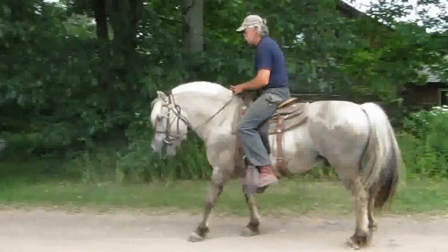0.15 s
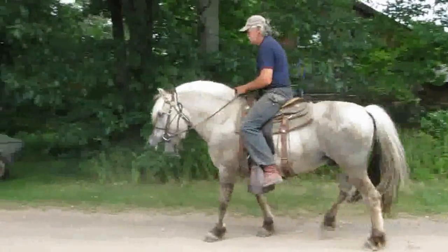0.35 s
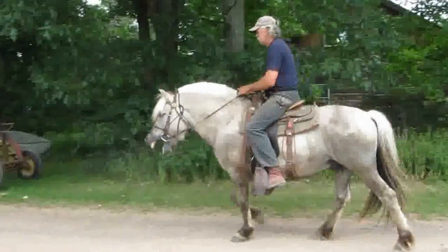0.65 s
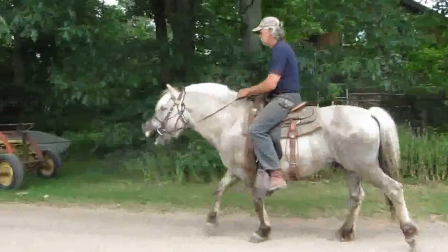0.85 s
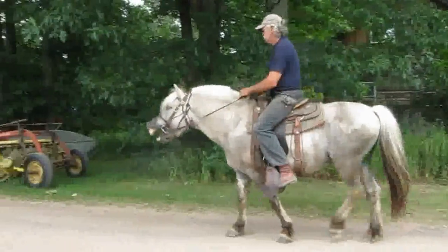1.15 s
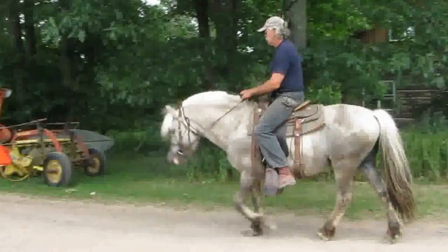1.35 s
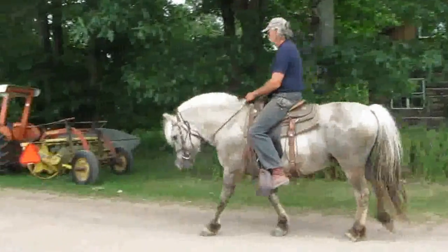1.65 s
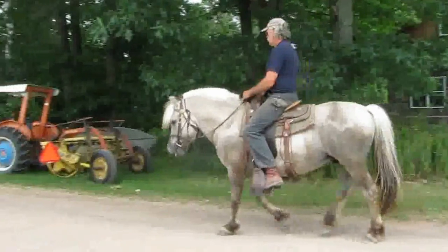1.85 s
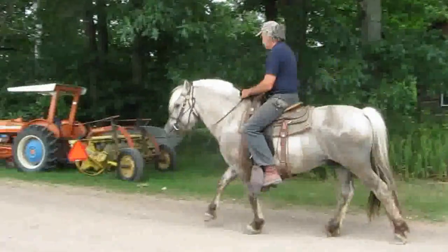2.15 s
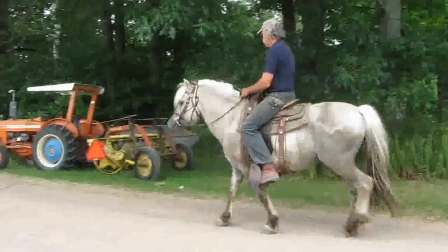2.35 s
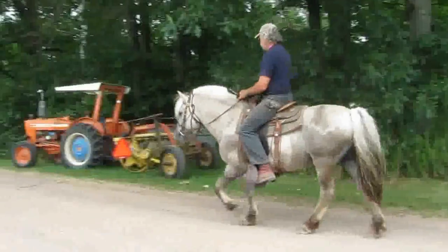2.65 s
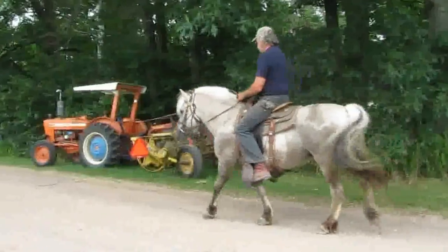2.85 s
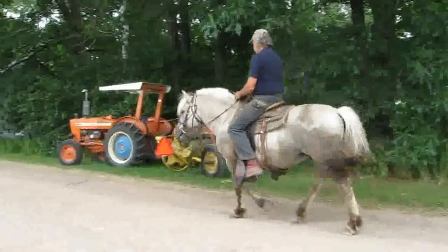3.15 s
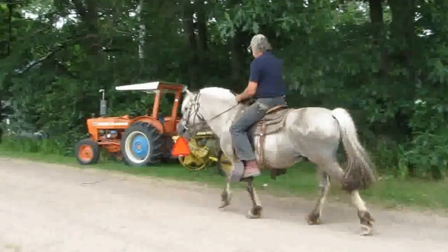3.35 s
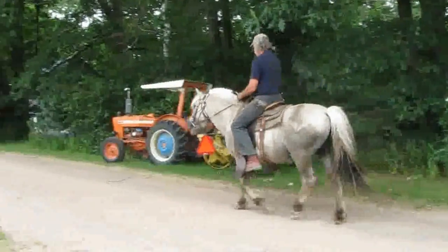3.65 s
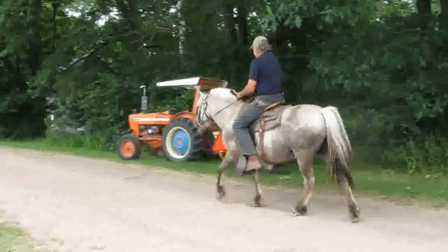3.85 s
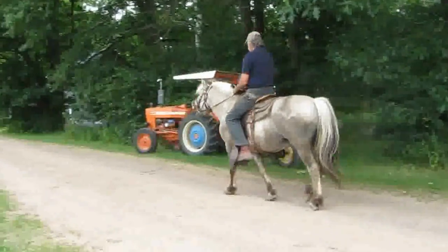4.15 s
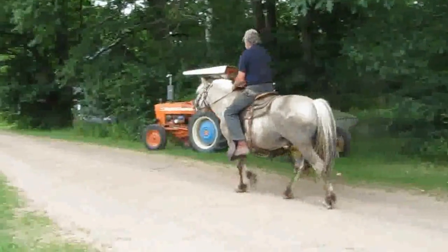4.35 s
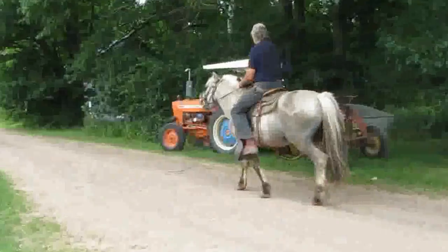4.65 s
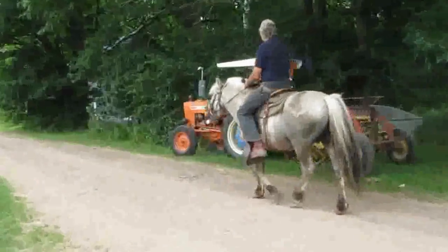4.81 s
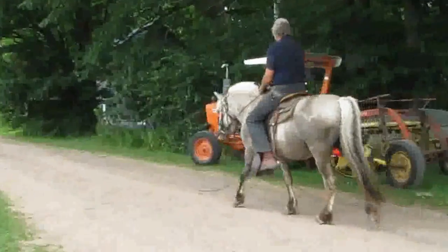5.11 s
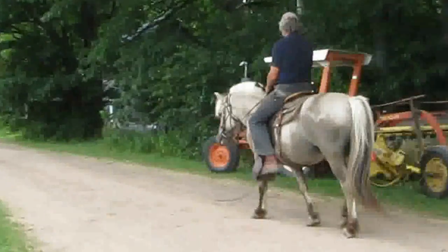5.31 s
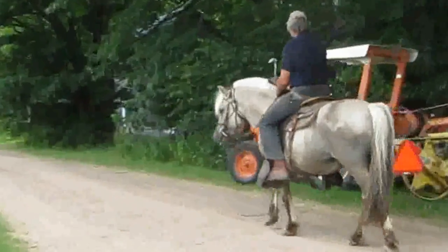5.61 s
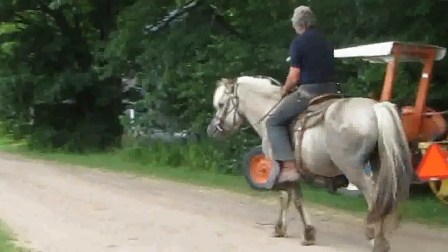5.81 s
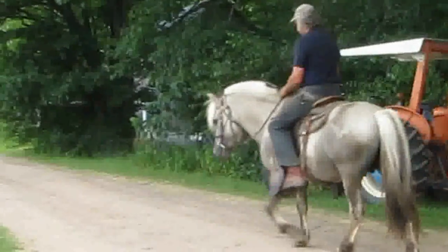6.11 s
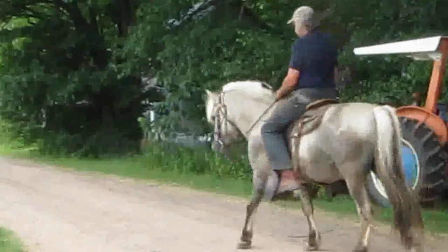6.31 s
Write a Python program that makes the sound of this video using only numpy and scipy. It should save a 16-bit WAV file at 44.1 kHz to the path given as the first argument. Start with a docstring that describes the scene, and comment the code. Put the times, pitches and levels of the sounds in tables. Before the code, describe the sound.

A horse walks on gravel, its hooves landing in crisp, slightly hollow crunches over faintly rustling leaves.

```python
"""A horse walks past on a gravel lane. Each hoof lands, rolls and lifts in several short crunches:
stones crack, the hollow hoof rings, the ground thuds and grit sprays. Loose gravel trickles between
the steps and swells where a hoof drags. Behind it: leaves, light wind on the microphone, a far rumble,
two low hums, a faint whine and a bird."""
import sys
import numpy as np
from scipy import signal
from scipy.io import wavfile
from scipy.ndimage import uniform_filter1d

SR = 44100
rng = np.random.default_rng(int(sys.argv[2]) if len(sys.argv) > 2 else 0)


def transcribe(signal):
    """Save signal, clipped to [-1, 1], as a 16-bit WAV file at the path in sys.argv[1]."""
    frames = np.atleast_2d(signal).T
    limited = np.clip(frames, -1, 1)
    pcm = np.round(limited * 32767).astype(np.int16)
    wavfile.write(sys.argv[1], SR, pcm)


N = 285371

# loose gravel under the moving legs: t/s, grit level/dB
TRICKLE_LEVEL = [(0.0, -50), (0.52, -60.5), (0.7, -46), (1.15, -52.5), (1.4, -41), (1.85, -54), (2.25, -43),
                 (2.61, -46.5), (2.72, -41), (3.03, -46.5), (3.33, -41), (3.66, -50.5), (4.11, -47),
                 (4.79, -50.5), (5.73, -45.5), (5.9, -53), (6.13, -56.5), (6.29, -43), (6.47, -48)]


def crunches():
    """Each crunch is a crack plus a burst of grains that drives hoof, stones, grit and ground."""
    # hoof contacts: t/s, crack/dB p-p, hoof/dB, stones/dB, stone f/Hz, grit/dB, ground/dB, length/ms
    contacts = [(0.1125, -28, -54, -46, 1880, -41, -71, 2.5), (0.2102, -16, -38, -31.5, 4100, -37, -61, 12),
                (0.2216, -25, -28.5, -32, 2700, -28, -37.5, 12.6),
                (0.5805, -29, -40, -35, 4570, -32, -62, 35),
                (0.5965, -9.5, -45, -30.5, 3380, -37, -61, 4.6), (0.628, -26, -55, -45, 3500, -42, -60, 3),
                (0.6734, -9, -29, -32.5, 2180, -25, -30, 7.3),
                (0.73, -24, -37.5, -39, 1640, -32.5, -39, 6.2), (0.7882, -9, -35, -39, 2340, -36, -50, 15),
                (0.8072, -12, -38, -42, 2790, -30, -56, 22), (0.8665, -16, -48, -43.5, 2600, -41, -66, 4.7),
                (0.89, -21, -46, -36.5, 4500, -31, -66, 19), (0.917, -25, -64, -50, 3970, -33, -63, 11),
                (1.059, -22, -36.5, -31.5, 2590, -35.5, -37.5, 5.8),
                (1.1164, -14, -52, -44, 4450, -35.5, -62, 23),
                (1.1606, -30, -56, -55, 4300, -35.5, -55, 2.1), (1.331, -14, -35, -37, 2460, -33, -56, 5),
                (1.339, 1.5, -29.5, -29, 1610, -24.5, -37, 6), (1.3565, -15, -45, -50, 3500, -26, -53, 2.8),
                (1.4037, -5.5, -43, -33, 2600, -34, -58, 11),
                (1.4146, -10, -31.5, -30, 2530, -23, -33.5, 13.5),
                (1.4386, -25, -36, -36, 2510, -30, -54, 8), (1.489, -26, -58, -33.5, 1780, -35, -45, 1.7),
                (1.5526, -25, -44, -30, 2360, -28, -40, 3.6),
                (1.5623, -2, -46, -27.5, 2500, -19.5, -39, 30),
                (1.6273, -30, -56, -29.5, 2520, -34, -49, 2.7), (1.711, -13, -40, -34.5, 3100, -34, -62, 6),
                (1.725, -10, -56, -38, 2300, -36, -56, 2.3), (1.7486, -16, -44, -33, 4180, -51, -53, 12),
                (1.758, -9, -44, -36.5, 1710, -32, -54, 9.6), (1.7903, -10, -50, -34.5, 4050, -43, -47, 11),
                (1.8208, -8, -39, -36, 2680, -39, -54, 4), (1.8436, -24, -40, -34, 2370, -31, -65, 2.2),
                (1.8737, -29, -39.5, -35, 3570, -32.5, -40, 10),
                (1.9131, -6.5, -40, -34.5, 4060, -34, -60, 28), (2.0808, -6, -37, -26, 4800, -37, -33, 12),
                (2.0967, -3, -23.5, -44, 2840, -27, -28, 4.8), (2.1165, -25, -33, -49, 2280, -37, -44, 7.6),
                (2.153, -16, -30.5, -54, 4340, -24, -60, 1.4),
                (2.181, -1, -16.5, -22, 3180, -18.5, -36.5, 6.2),
                (2.191, -25, -36, -37, 3350, -25, -50, 18), (2.3015, -23, -48, -55, 3260, -35, -44, 4.4),
                (2.371, -19, -30, -46, 2900, -27.5, -33, 18), (2.381, -13, -33.5, -27, 2500, -39, -42, 8.2),
                (2.4136, -18, -42, -40, 3230, -45, -56, 11), (2.4555, -35, -53, -42, 2460, -55, -56, 2.6),
                (2.4988, -32, -61, -25.5, 3200, -53, -41, 5.8),
                (2.5417, -8.5, -58, -35, 2700, -53, -54, 11), (2.5462, -10, -57, -46, 2700, -45, -52, 3),
                (2.5976, -7, -35.5, -30, 4700, -28, -45, 21), (2.6987, -20, -35, -29, 2330, -30, -32.5, 13),
                (2.708, -2.5, -20, -26, 1580, -28, -35.5, 14),
                (2.7447, -2, -24.5, -24, 2510, -24, -41, 13.4),
                (2.7852, -28, -28, -33, 2010, -52, -41, 1.7), (2.8028, 2.5, -30, -35, 3970, -34, -40, 22),
                (2.8238, 2, -22.5, -22, 3930, -15.5, -41, 6.3), (2.864, -25, -28, -29, 3540, -47, -36, 3.1),
                (2.964, -31, -37.5, -44, 2550, -35, -33, 14),
                (2.9846, -8.5, -34.5, -35, 2640, -31.5, -37, 20),
                (3.1063, -7, -34.5, -32.5, 2570, -37, -54, 23), (3.174, -22, -37, -33, 3050, -35, -48, 1.8),
                (3.1868, -10, -30.5, -28.5, 1770, -44, -38, 4.6),
                (3.2206, -7, -26, -23.5, 3600, -38, -40, 9.5),
                (3.2984, -1.5, -28.5, -24, 2480, -28, -35.5, 8.1),
                (3.3077, -2.5, -23, -43, 3320, -20, -32.5, 11),
                (3.3727, -21, -42, -33, 2260, -34, -48, 3.6),
                (3.3793, -10, -29.5, -39, 2240, -30, -40.5, 16), (3.393, -24, -39, -45, 2500, -36, -50, 3),
                (3.4072, -22, -45, -38, 3640, -34, -56, 4.5), (3.5137, -28, -44, -42, 2770, -49, -50, 3.1),
                (3.5359, -18, -32, -29.5, 2230, -24.5, -36.5, 20),
                (3.6324, -35, -47, -19, 3500, -33, -45, 2.2),
                (3.6894, -31, -49, -33.5, 2380, -48, -60, 3.3), (3.74, -17, -54, -60, 3260, -38, -52, 4.3),
                (3.8255, -14, -47, -34, 2520, -42, -36.5, 14),
                (3.8452, -15, -37.5, -33, 3860, -25, -28, 15), (3.9368, -6, -48, -41, 2880, -32, -50, 17),
                (3.9589, -10, -40, -45, 3540, -33, -54, 14), (3.976, -12, -31, -25, 4570, -23, -36, 44),
                (3.9906, -7, -21.5, -20.5, 2750, -25.5, -60, 17),
                (4.0884, -13, -38, -27.5, 2500, -38, -41, 4.5), (4.168, -36, -42, -38, 2590, -57, -51, 4.9),
                (4.213, -8.5, -31.5, -30.5, 1830, -35, -61, 2.1),
                (4.2756, -9, -49, -29, 2780, -28, -51, 6.5), (4.288, -4, -36.5, -26.5, 3570, -30, -44, 3.3),
                (4.4517, -8.5, -26, -31.5, 2940, -27.5, -28.5, 17),
                (4.6799, -15, -42, -37, 3020, -35.5, -41, 13), (4.805, -22, -52, -43, 2390, -52, -52, 3.7),
                (4.8206, -15.5, -42, -51, 4400, -55, -47, 6.5),
                (4.858, -32, -43, -37, 3020, -35.5, -51, 48), (4.8917, -21, -50, -39, 2340, -41, -57, 3.4),
                (4.995, -20, -38, -32, 2440, -38, -44, 5.9), (5.009, -6, -31.5, -28, 3700, -30.5, -39, 23),
                (5.1096, -21, -51, -42, 4300, -40, -61, 5.6), (5.2555, -18, -40, -30, 4530, -33, -38.5, 33),
                (5.2701, -11, -49, -30.5, 3040, -35, -40, 9),
                (5.4515, -14, -43, -30.5, 3700, -47, -52, 3.2),
                (5.4603, -4, -37, -26.5, 3400, -29, -43, 13),
                (5.5792, -21, -24, -28.5, 2730, -25, -32, 16.5),
                (5.5901, -13, -35, -26.5, 4500, -25.5, -36, 18.5),
                (5.6476, -30, -49, -20.5, 3500, -45, -56, 2.7),
                (5.6997, -16, -59, -42, 3940, -35, -47, 4.1),
                (5.7555, -7.5, -35.5, -33, 4310, -27.5, -50, 9.2),
                (5.8068, -6.5, -38, -24, 1670, -31.5, -39, 2.5),
                (5.824, -25, -31, -29.5, 2360, -46, -37, 4.7),
                (5.8835, -36, -48, -37.5, 2200, -55, -47, 4.8), (6.1005, -31, -45, -32, 2500, -33, -41, 29),
                (6.126, -3, -29, -33, 4360, -28, -53, 6.8), (6.272, -8, -57, -28, 4140, -20.5, -39, 14),
                (6.2845, -7, -27, -22.5, 4530, -21, -48, 23),
                (6.4542, -27, -32.5, -34, 3700, -31.5, -41, 22)]
    # hoof pitch, lower as the horse turns away: t/s, f/Hz
    hoof_track = [(0, 957), (3, 990), (6.47, 843)]
    # heavier thuds are deeper: ground level/dB, f/Hz
    thud_pitch = [(-34, 288), (-30, 134)]
    # ground resonances: f/Hz, width/Hz, gain/dB
    ground_modes = [(143, 73, -43), (300, 460, -11.5)]
    size, window = 5000, SR // 400  # levels but the crack's: energy as rms over 2.5 ms
    rise_s, push_s = 0.00072, 0.0061
    t, out = np.arange(size) / SR, np.zeros(N + size)
    rows = np.vstack([contacts, small_crunches()])
    rubs = grains((len(rows), size), spread_db=4.0)
    hoof_pitch = np.interp(rows[:, 0], *np.transpose(hoof_track))
    hoof_pitch *= np.exp(0.022 * rng.standard_normal(len(rows)))
    ground_pitch = np.interp(rows[:, 6], *np.transpose(thud_pitch))
    ground_pitch *= np.exp(0.34 * rng.standard_normal(len(rows)))
    crack = ring(signal.unit_impulse(size, 40), [(6540, 8700, 0)])
    for row, rub, hoof_hz, ground_hz in zip(rows, rubs, hoof_pitch, ground_pitch):
        start_s, crack_db, hoof_db, stones_db, stone_hz, grit_db, ground_db, length_ms = row
        length_s = length_ms / 1000
        shift = np.exp(-(t / length_s) ** 3)
        settle = .13 * np.exp(-t / (2.4 * length_s))
        burst = rub * (1 - np.exp(-t / rise_s)) * (shift + settle)
        # one stone rings among its neighbours
        stones = band(ring(burst, [(stone_hz, .16 * stone_hz, 0), (2800, 2500, -11)]), 1400, 4400)
        push = burst * np.exp(-t / push_s)  # the hoof loads the ground only at the start
        ground = band(ring(push, [(ground_hz, 0.32 * ground_hz, 0)] + ground_modes), 75, 587)
        i = int(start_s * SR)
        out[i:i + size] += (undb(crack_db) * crack / np.ptp(crack)
                            + undb(hoof_db) * unit(hoof_ring(burst, hoof_hz), window)
                            + undb(stones_db) * unit(stones, window)
                            + undb(grit_db) * unit(grit(burst), window)
                            + undb(ground_db) * unit(ground, window))
    return out[:N]


def small_crunches(count=12):
    """Rows of weak random contacts, more frequent where the trickle is thick."""
    # mean levels: crack/dB, hoof/dB, stones/dB, grit/dB, ground/dB
    mean_db = (-33, -51, -38, -42, -49.5)
    share = np.cumsum(undb(curve(TRICKLE_LEVEL)[0]))
    jitter, pitch_draw, length_draw = rng.random((count, 3)).T
    start_s = np.interp((np.arange(count) + jitter) / count, share / share[-1], np.arange(N) / SR)
    crack_db, hoof_db, stones_db, grit_db, ground_db = (mean_db + .5 * rng.standard_normal((count, 5))).T
    stone_hz = np.interp(pitch_draw, (0, 1), (1720, 4400))
    length_ms = np.interp(length_draw, (0, 1), (4.4, 15))
    return np.transpose([start_s, crack_db, hoof_db, stones_db, stone_hz, grit_db, ground_db, length_ms])


def hoof_ring(drive, hz):
    """The hollow hoof wall rings near 1 kHz and hardly radiates below."""
    # wall modes: f/hoof pitch, width/hoof pitch, gain/dB
    wall_modes = [(1, .14, 6), (.82, .15, -1), (1.18, .18, -47)]
    modes = [(ratio * hz, width * hz, db) for ratio, width, db in wall_modes]
    return band(ring(drive, modes), .79 * hz, 1400)


def grit(drive):
    """The finest stones hiss in the treble only."""
    # grit resonances: f/Hz, width/Hz, gain/dB
    grit_modes = [(6200, 6300, 21), (8820, 1180, 17), (9500, 4400, -51)]
    return band(ring(drive, grit_modes), 5120, 11400)


def grains(shape, spread_db):
    """Dense clicks of rubbing stones, a few larger, capped at the biggest stone."""
    return rng.standard_normal(shape) * undb(spread_db * np.minimum(rng.exponential(size=shape), 7))


def trickle():
    """Small stones patter throughout and swell to a dense crunch where a hoof drags."""
    # hoof drags: centre t/s, grit level/dB, half length/ms
    scuffs = [(1.356, -39, 10), (1.571, -39.5, 46), (1.8, -43.5, 117), (2.12, -41, 30), (2.84, -38, 40),
              (3.322, -45, 21), (3.976, -38.5, 26), (4.018, -36.5, 32), (4.249, -41.5, 16),
              (4.609, -45, 15), (5.83, -42, 27), (6.136, -35, 36), (6.2, -40.5, 16), (6.299, -35, 14),
              (6.327, -38.5, 19.6), (6.385, -50.5, 8.9)]
    t_ms = np.arange(N) / SR * 1000
    drag = sum(undb(db) * np.exp(-((t_ms - 1000 * s) / half_ms) ** 2) for s, db, half_ms in scuffs)
    patter = undb(curve(TRICKLE_LEVEL)[0])
    # separate clicks, shared spurts
    fine, coarse = grains((2, N), spread_db=4.2) * undb(3.5 * walk(220))
    return ((patter + drag) * unit(grit(fine))
            + undb(-3) * (patter + drag) * unit(band(coarse, 1500, 5760))
            + (undb(-11) * patter + undb(-11.5) * drag) * unit(hoof_ring(coarse, hz=952)))


def leaves():
    """Distant foliage and air: half-octave bands that swell together and flicker alone."""
    # foliage spectrum: f/Hz, relative density/dB
    spectrum = [(24, -31), (40, -15), (87, 4.5), (556, -5.5), (849, -3.5), (1800, -15.5), (2560, -13.5),
                (3910, -12.5), (9110, -10), (10300, -13), (11000, -21), (14300, -53), (22000, -120)]
    # foliage level: t/s, level/dB
    level = [(0, -51), (.5, -51), (1.2, -48.5), (6.47, -47)]
    out, swell_db = 0, 0.18 * walk(0.11)
    points_hz, points_db = np.transpose(spectrum)
    for hz in 45 * 2 ** np.arange(0, 8.1, .5):
        mode = [(hz, hz / 2, 0)]
        rustle = ring(ring(rng.standard_normal(N), mode), mode)
        band_db = np.interp(np.log(hz), np.log(points_hz), points_db)
        out = out + rustle * undb(band_db + swell_db + walk(8))
    return unit(out) * undb(curve(level)[0])


def wind():
    """Slow buffeting at the microphone port."""
    # gusts: t/s, level/dB
    level = [(0.0, -58), (0.45, -55), (1.1, -48.5), (1.25, -55.5), (2.4, -56), (2.5, -43), (2.62, -45.5),
             (2.8, -56), (4.05, -56), (5.7, -54), (6.04, -61), (6.16, -44), (6.31, -56), (6.47, -56)]
    buffet = band(rng.standard_normal(N), 10, 48) * undb(2 * walk(10))
    return unit(buffet) * undb(curve(level)[0])


def rumble():
    """A far, uneven rumble."""
    # rumble swells: t/s, level/dB
    level = [(.2, -85), (.5, -55), (1.3, -56.5), (1.7, -77), (5.6, -79), (6.2, -57)]
    noise = band(rng.standard_normal(N), 127, 189) * undb(3.0 * walk(6.9))
    return unit(noise) * undb(curve(level)[0])


def hums(upper_hz=102.3, lower_hz=61.0):
    """Two low hums that trade places in level."""
    # hum levels: t/s, upper/dB, lower/dB
    levels = [(0.0, -56, -66), (2.03, -53.5, -60), (2.6, -57.5, -59), (4.58, -63, -60), (5.37, -68, -51),
              (5.73, -55.5, -56.5), (6.47, -80, -58)]
    return sum(undb(db) * tone(hz, waver_hz=1.515, flutter_db=-0.5)
               for hz, db in zip((upper_hz, lower_hz), curve(levels)))


def whine():
    """A thin, high whine."""
    # whine level: t/s, level/dB
    level = [(0, -69), (3.4, -67), (3.8, -63), (6.47, -63)]
    return undb(curve(level)[0]) * tone(hz=7881, waver_hz=8, flutter_db=2.5)


def bird():
    """Faint, hoarse notes; each swells and fades as it slides up."""
    # notes: t/s, length/s, level/dB, start f/Hz, end f/Hz
    notes = [(1.89, .11, -54, 2200, 3450), (4.33, .075, -56, 5950, 6000), (5.84, .17, -54, 6450, 6750),
             (6.34, .09, -55, 6450, 6500)]
    t, gain, hz = np.arange(N) / SR, np.zeros(N), np.zeros(N)
    for start_s, length_s, db, start_hz, end_hz in notes:
        along = np.clip((t - start_s) / length_s, 0, 1)
        gain += undb(db) * np.sqrt(np.abs(np.sin(np.pi * along))) * (along < 1)
        hz = np.where(t >= start_s, start_hz + along * (end_hz - start_hz), hz)
    rasp = walk(450)
    return gain * rasp * tone(hz, waver_hz=20, flutter_db=1.5)


def tone(hz, waver_hz, flutter_db):
    """Sine with wavering pitch and level; rms near 1."""
    phase = 2 * np.pi * np.cumsum(hz + waver_hz * walk(4.8)) / SR
    return np.sqrt(2) * np.sin(phase) * undb(flutter_db * walk(10))


def walk(rate_hz):
    """Random steps at rate_hz, smoothed twice; spread near 1."""
    hold = int(SR / rate_hz)
    steps = np.repeat(rng.standard_normal(N // hold + 1), hold)
    return 1.5 * uniform_filter1d(uniform_filter1d(steps, hold), hold)[:N]


def ring(x, modes):
    """Sum of resonances: f/Hz, width/Hz, gain/dB."""
    return sum(undb(db) * signal.lfilter(*signal.iirpeak(hz, hz / width_hz, fs=SR), x)
               for hz, width_hz, db in modes)


def band(x, lo_hz, hi_hz):
    """Butterworth band-pass."""
    return signal.sosfilt(signal.butter(3, (lo_hz, hi_hz), "band", fs=SR, output="sos"), x)


def curve(table):
    """Value columns of a (t/s, value, ..) table, interpolated per sample."""
    times_s, *columns = np.transpose(table)
    return [np.interp(np.arange(N) / SR, times_s, column) for column in columns]


def unit(x, size=None):
    """Scale to rms 1, or to the energy of `size` samples at rms 1."""
    return x / np.sqrt(np.sum(x ** 2) / (size or len(x)))


def undb(db):
    """dB to gain."""
    return 10 ** (np.asarray(db) / 20)


def scene():
    """Hooves, gravel and surroundings; mono."""
    return (crunches() + trickle() + leaves() + wind() + rumble() + hums() + whine() + bird())[None]


def record(dry, top_hz=11080):
    """The camera cuts the top steeply."""
    return signal.sosfilt(signal.ellip(12, .5, 85, top_hz, fs=SR, output="sos"), dry)


dry = scene()
out = record(dry)
transcribe(out)
```